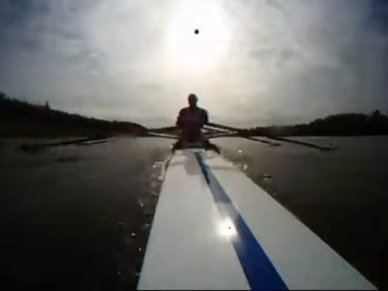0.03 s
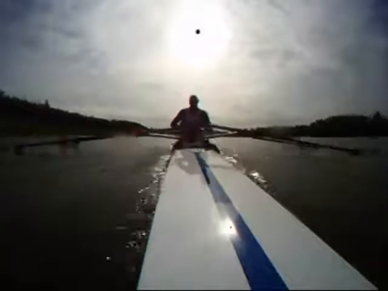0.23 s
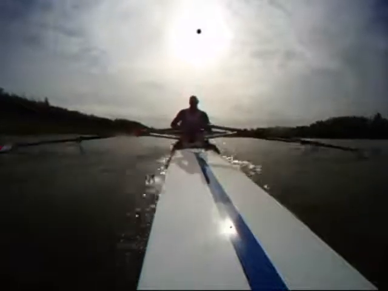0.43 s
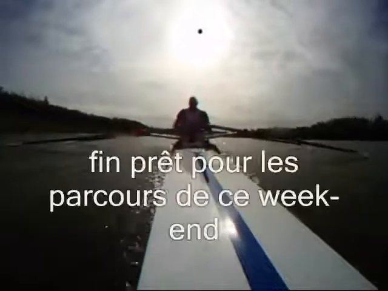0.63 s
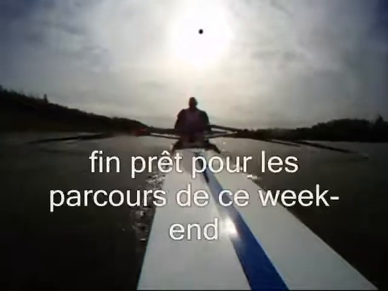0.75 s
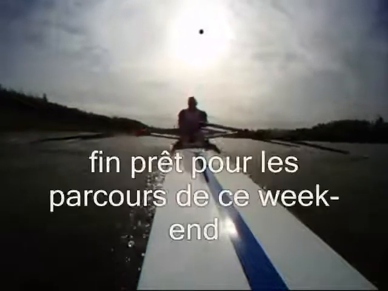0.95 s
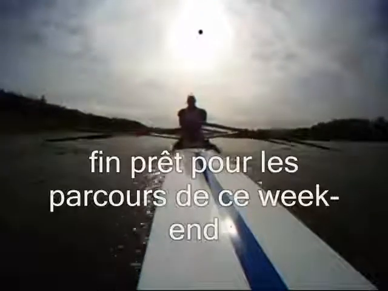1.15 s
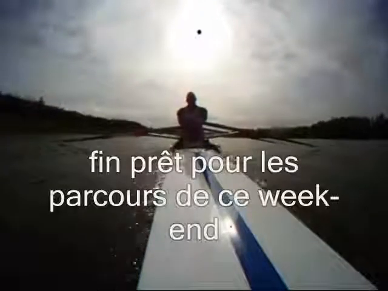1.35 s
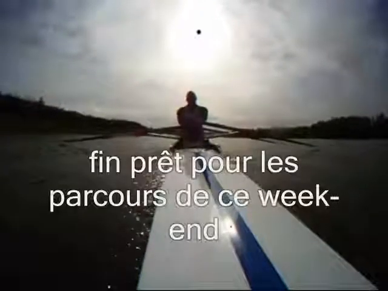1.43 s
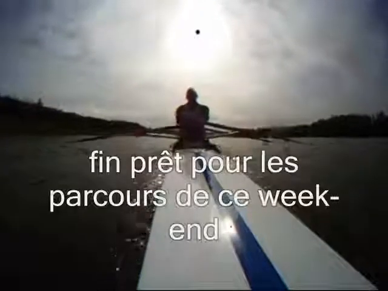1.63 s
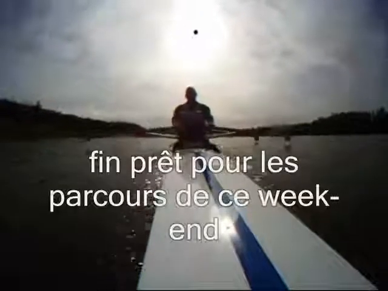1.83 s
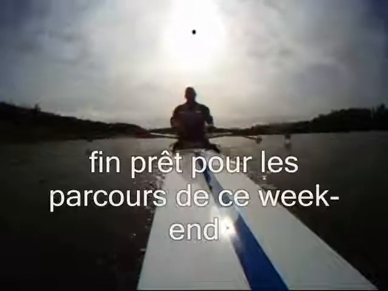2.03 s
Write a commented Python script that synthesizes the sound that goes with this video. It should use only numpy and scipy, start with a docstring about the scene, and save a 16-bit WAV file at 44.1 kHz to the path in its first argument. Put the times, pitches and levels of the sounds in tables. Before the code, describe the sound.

A rowing stroke, with clunking oars, a hollow hull boom, small splashes and light wind.

```python
"""A racing rowing boat, heard from its own deck. Water fizzes along the sides in a light wind.
At about 0.4 s the oars clunk round in their locks and leave the water with a short splash, while
the hollow hull booms and a loose fitting ticks. Then the seat rolls up its slide, making the hull
rumble. Near 1.7 s the blades drop in again, with more knocks, ticks and a few light clinks."""
import sys
import numpy as np
from scipy import signal
from scipy.fft import rfft, irfft, next_fast_len
from scipy.io import wavfile
from scipy.ndimage import uniform_filter1d

SR = 44100
rng = np.random.default_rng(int(sys.argv[2]) if len(sys.argv) > 2 else 0)


def wrap_up_sound(samples):
    """Save the sound to the file named by the first command line argument, as 16-bit audio."""
    columns = np.atleast_2d(samples).T
    # keep every value between -1 and 1, then stretch to whole-number steps
    tamed = np.clip(columns, -1, 1)
    steps = np.round(tamed * 32767).astype(np.int16)
    wavfile.write(sys.argv[1], SR, steps)


N = 92610
TIME = np.arange(N) / SR

# Levels are relative. A ring or fade time is how long a sound takes to drop by 60 dB.
# tone of the wind (f/Hz, level/dB)
WIND_TONE = [(20, 1.5), (45, 8), (75, 1), (110, -13.5), (250, -19.5), (500, -38)]
# water running along the hull (t/s, level/dB) and its tone (f/Hz, level/dB)
FLOW_LEVEL = [(0, -63), (.08, -66.5), (.12, -74), (.14, -69), (.16, -67.5), (.28, -63), (.7, -66.5),
              (.95, -62), (1.22, -65.5), (1.55, -60.5), (1.88, -65), (2.1, -67)]
FLOW_TONE = [(400, -3.5), (670, 3.5), (760, -4.5), (900, 3), (1200, -4.5), (1400, -1.5), (1580, 4.5),
             (2250, -3), (2500, -5), (3900, -11), (5200, -8.5), (5900, -11.5), (6350, -7), (6900, -18.5),
             (9000, -20), (9700, -13), (11000, -15.5), (12500, -17)]
# single drops on the deck (t/s, level/dB) and their tone (f/Hz, level/dB)
DECK_DROPS = [(0.023, -55), (0.039, -59), (.052, -53), (0.07, -50.5), (.088, -57), (1.1422, -49),
              (1.15, -52.5), (1.2921, -46.5), (1.305, -52.5), (1.384, -53.5), (2.042, -49.5), (2.083, -49)]
DROP_TONE = [(1200, -10), (3000, 6.5), (4500, -3), (8000, -12.5), (12500, -9)]
# splashes of the blades (peak t/s, level/dB, 20 dB rise/s, 20 dB fall/s) and their tone (f/Hz, level/dB)
BLADE_SPLASHES = [(0.154, -65, .008, 0.23), (0.317, -55.5, 0.0086, 0.094), (0.412, -42, 0.058, 0.07),
                  (.5, -55, .1, 0.34), (0.746, -56.5, 0.0091, 0.058), (1.03, -62, 0.15, 0.05),
                  (1.688, -58, 0.01, 0.059), (1.743, -52.5, 0.062, 0.15), (1.812, -55.5, 0.035, 0.026)]
SPLASH_TONE = [(400, 4.5), (700, -6), (1100, 0), (1700, -2.5), (2700, -8.5), (4200, -8), (6000, -13.5),
               (9500, -15), (12500, -14.5)]
# clinks of the rigging (t/s, level/dB) and the notes it rings at (f/Hz, level/dB, ring/s)
RIGGING_CLINKS = [(1.6795, -45.5), (1.9315, -45.5), (2.01, -57)]
RIGGING_NOTES = [(1572, 0, 0.03), (1700, -7, 0.028), (1950, -8, .025), (6360, -9, 0.029),
                 (9950, -12.5, .018)]
# ticks of a loose fitting (t/s, level/dB) and the notes it rings at (f/Hz, level/dB, ring/s)
FITTING_TICKS = [(.373, -45.5), (.383, -44.5), (.387, -43), (.421, -42), (.433, -41), (.439, -52),
                 (.4922, -41.5), (.504, -45), (.518, -45), (.526, -58), (.574, -49), (.586, -49.5),
                 (.5975, -46.5), (.611, -62), (.619, -53), (.6414, -57), (.6833, -56.5), (.7197, -53),
                 (.726, -65), (.7421, -56.5), (.7581, -51), (.796, -55), (1.0215, -52.5), (1.0509, -52),
                 (1.7354, -47.5), (1.7479, -45.5), (1.7615, -45), (1.771, -46), (1.7928, -49)]
FITTING_NOTES = [(2474, 0, 0.018), (2774, -0.5, 0.015), (5400, -2, 0.012), (7880, -14, 0.017),
                 (10600, -7.5, 0.01)]
# the hull's deepest vibration (t/s, level/dB)
BOOM_LEVEL = [(0.0, -44), (0.03, -41), (0.12, -53.5), (0.19, -27.5), (0.35, -34.5), (0.41, -14.5),
              (0.44, -14.5), (0.6, -28), (0.69, -27.5), (0.72, -37.5), (0.77, -27.5), (0.99, -32),
              (1.03, -27), (1.14, -43.5), (1.2, -33), (1.23, -40.5), (1.37, -34), (1.53, -46),
              (1.61, -35.5), (1.7, -31.5), (1.74, -22), (1.8, -24), (1.85, -35), (1.88, -30), (1.9, -28.5),
              (1.94, -44), (2.03, -34.5), (2.1, -44.5)]
# notes the hollow hull rings at (f/Hz, level/dB, ring/s)
HULL_NOTES = [(136.74, 10.5, 0.4), (166.7, -7, 0.28), (196, 2.5, 0.091), (269.6, -2, 0.15),
              (281.1, -0.5, 0.25), (356.1, -7.5, 0.12), (434.7, -5.5, 0.16), (499, -11.5, 0.19),
              (594.4, -10.5, 0.033), (663.6, -15, 0.29), (890, -15.5, 0.023)]
# low, middle and upper rumble as seat and oars shake the hull (t/s, level/dB)
LOW_RUMBLE = [(0, -54), (.13, -56), (.155, -43), (.25, -47), (.3, -34), (.42, -29), (.54, -32), (.63, -44),
              (.84, -48), (.93, -39), (.98, -47), (1.03, -45.5), (1.19, -48), (1.57, -52), (1.68, -49),
              (1.81, -32.5), (1.86, -44), (1.92, -38.5), (2.1, -55)]
MID_RUMBLE = [(0, -56), (.135, -56.5), (.155, -41), (.22, -44.5), (.3, -40), (.335, -30.5), (.41, -40.5),
              (.5, -36), (.63, -51.5), (.76, -48), (.97, -60), (1.03, -44), (1.25, -57.5), (1.32, -54),
              (1.42, -59.5), (1.58, -58), (1.62, -50.5), (1.67, -52.5), (1.72, -30.5), (1.76, -39),
              (1.81, -28.5), (1.88, -49.5), (1.92, -41), (1.99, -55), (2.1, -56.5)]
UPPER_RUMBLE = [(0, -68.5), (.135, -69.5), (.155, -53), (.23, -57.5), (.3, -52), (.335, -57), (.42, -38.5),
                (.48, -47.5), (.62, -65), (.7, -55), (.75, -101), (.8, -68), (.99, -73), (1.02, -57),
                (1.1, -71), (1.45, -71), (1.67, -64), (1.7, -48.5), (1.77, -55), (1.82, -42), (1.88, -60),
                (2, -66), (2.1, -95)]
# knocks on the hull (t/s, level/dB, favoured f/Hz)
HULL_KNOCKS = [(.148, -33.5, 214), (.29, -37, 148), (.331, -21.5, 350), (0.3904, -15, 180.8),
               (.742, -43, 450), (1.003, -37, 140), (1.02, -38.5, 399), (1.301, -43, 326),
               (1.482, -35, 309), (1.609, -44, 350), (1.697, -28, 294), (1.79, -29, 258), (1.815, -26, 408),
               (1.915, -36.5, 214), (2.01, -34, 304)]
# oars hitting their locks (t/s, crack level/dB, crack fade/s, thud level/dB)
OAR_HITS = [(0.337, -56, 0.014, -34.5), (0.349, -49, .012, -48), (0.3713, -35, 0.0064, -31),
            (.3897, -33.5, 0.059, -20), (0.3945, -34, 0.018, -25.5), (0.4044, -29, 0.022, -29.5),
            (0.4139, -25.5, 0.012, -17), (.416, -24, 0.02, -29.5), (0.431, -38, 0.022, -46)]
# tone of the crack (f/Hz, level/dB)
CRACK_TONE = [(350, 6), (680, 2), (880, -2), (1250, -4), (1530, 2), (2000, -9.5), (2550, -5.5), (4100, -22),
              (5400, -11.5), (6800, -17.5), (8000, -22), (9500, -18), (12500, -29)]
# notes of the rigger, the arm that holds the lock (f/Hz, level/dB, ring/s)
RIGGER_NOTES = [(234.6, 0.5, .1), (251, -4, 0.26), (332, -6, 0.15), (372.5, -4.5, 0.078),
                (432.4, -6.5, .11), (470, -8, 0.071), (498, -9.5, 0.098), (600, -29, 0.094),
                (765, -21, .06), (828, -27, 0.081), (1480, -22, 0.034)]
# high pitches around which the bass is mirrored (f/Hz, level/dB)
SIZZLE_PITCHES = [(8013, 4.5), (12060, -7.5)]


def from_db(db):
    return 10 ** (np.asarray(db) / 20)


def unit_level(x):
    """Scales a signal to an average power of 1."""
    return x / np.sqrt(np.mean(x ** 2) + 1e-20)


def curve(points):
    """Joins (time, value) points with straight lines."""
    return np.interp(TIME, *np.transpose(points))


def filtered(x, hz, kind="low", order=2):
    """Keeps the lows, the highs or a band between two pitches."""
    return signal.sosfilt(signal.butter(order, hz, kind, fs=SR, output="sos"), x)


def drift(rate_hz):
    """A smooth random wander, about 1 in size."""
    step, warm_up = 40, 2000
    r = np.exp(-2 * np.pi * rate_hz * step / SR)
    noise = rng.standard_normal(N // step + warm_up + 2)
    slow = signal.lfilter([1], [1, -2 * r, r * r], noise)[warm_up:]
    return np.interp(np.arange(N) / step, np.arange(len(slow)), unit_level(slow))


def ring(x, hz, ring_s):
    """Every push in x starts a pure note that dies away."""
    r = from_db(-60 / (ring_s * SR))
    angle = 2 * np.pi * hz / SR
    return signal.lfilter([0, np.sin(angle)], [1, -2 * r * np.cos(angle), r * r], x + 1e-18)


def shape_tone(x, tone):
    """Gives x the balance of lows and highs in a tone table, fading beyond its ends."""
    size = 2 * next_fast_len(N)
    hz, db = np.transpose(tone)
    f = np.maximum(np.arange(size // 2 + 1) * SR / size, 1)
    gain = from_db(np.interp(np.log(f), np.log(hz), db))
    gain /= np.hypot(1, (hz[0] / f) ** 2 / 2) * np.hypot(1, (f / hz[-1]) ** 4 / 2)
    # fold the filter so that nothing sounds before the hit that causes it
    folded = irfft(np.log(unit_level(gain) + 1e-9))
    folded[1:size // 2] *= 2
    folded[size // 2 + 1:] = 0
    return irfft(rfft(x, size) * np.exp(rfft(folded)))[:N]


def burst(start, fade_s):
    """A rough touch: noise that starts at once and dies away."""
    age = TIME - start
    return rng.standard_normal(N) * (age >= 0) * from_db(-60 * np.maximum(age, 0) / fade_s)


def crackle(per_s, spread_db):
    """Random clicks of uneven size."""
    sizes = from_db(spread_db * np.minimum(rng.exponential(1, N), 4)) * rng.choice([-1, 1], N)
    return unit_level(sizes * (rng.random(N) < per_s / SR))


def clicks(times, gains):
    """Single clicks at the given times."""
    out = np.zeros(N)
    np.add.at(out, np.clip((times * SR).astype(int), 0, N - 1), gains)
    return out


def follow_boom(amount):
    """A gain that rises and falls with the hull's boom."""
    boom_db = curve(BOOM_LEVEL)
    return from_db(amount * (boom_db - boom_db.mean()))


def wind():
    """Low buffeting that grows as the boat lurches."""
    return from_db(-42) * follow_boom(0.88) * shape_tone(rng.standard_normal(N), WIND_TONE)


def water():
    """Water fizzes along the hull; fine spray and single drops land on the deck."""
    flow = from_db(curve(FLOW_LEVEL) + 2.1 * drift(rate_hz=20))
    fizz = shape_tone(flow * crackle(per_s=7000, spread_db=5), FLOW_TONE)
    drops = sum(from_db(db) * burst(t, fade_s=0.0074) for t, db in DECK_DROPS)
    spray = from_db(-73) * crackle(per_s=250, spread_db=2.5)
    return fizz + shape_tone(drops + spray, DROP_TONE)


def splashes():
    """Blades leave and enter the water in a swell of fine crackle."""
    swell = sum(from_db(db - 20 * np.maximum((t - TIME) / rise, (TIME - t) / fall))
                for t, db, rise, fall in BLADE_SPLASHES)
    return shape_tone(swell * crackle(per_s=3500, spread_db=4), SPLASH_TONE)


def fitting_chatter():
    """The loose fitting rattles faintly, more so as the hull booms."""
    touches = from_db(-76) * follow_boom(0.79) * crackle(per_s=110, spread_db=3)
    # the square root stops long-ringing notes from building up louder
    return sum(from_db(db) * np.sqrt(np.log(1000) / (ring_s * SR)) * ring(touches, hz, ring_s)
               for hz, db, ring_s in FITTING_NOTES)


def small_part_taps(taps, notes, gain_db, scatter_db, grit, pitch_spread):
    """Light, gritty taps ring a small part, each with a slightly different pitch and mix of notes."""
    out = 0
    for t, db in taps:
        touch = clicks(np.array([t]), 1) + grit * burst(t, fade_s=0.012)
        tuning = 1 + pitch_spread * rng.standard_normal()
        for k, (hz, note_db, ring_s) in enumerate(notes):
            strength = from_db(gain_db + db + note_db + scatter_db * rng.standard_normal())
            out += (-1) ** k * strength * ring(touch, hz * tuning, ring_s)
    return out


def hull_boom(pitch_hz=47.53, wander_hz=1.53):
    """The deepest vibration of the boat, wandering a little in pitch."""
    phase = 2 * np.pi * np.cumsum(pitch_hz + wander_hz * drift(rate_hz=5.68)) / SR
    return np.sqrt(2) * from_db(curve(BOOM_LEVEL)) * np.sin(phase)


def hull_rumble(smooth_s=0.0402):
    """The rolling seat and turning oars shake the hull's low, middle and upper notes."""
    out = 0
    for level, gain_db, low_hz, high_hz in (
            (LOW_RUMBLE, -1, 90, 175), (MID_RUMBLE, -1.5, 175, 390), (UPPER_RUMBLE, -4, 390, 900)):
        notes = sum(from_db(db) * unit_level(ring(rng.standard_normal(N + SR), hz, ring_s))
                    for hz, db, ring_s in HULL_NOTES if low_hz <= hz < high_hz)
        band = filtered(notes, [low_hz * 0.88, high_hz * 1.014], "band")[SR:]  # skip the build-up
        power = np.abs(uniform_filter1d(band ** 2, int(smooth_s * SR)))
        steady = band / np.sqrt(power + 1e-20)  # even out chance swells
        out += from_db(curve(level) + gain_db) * steady
    return out


def hull_knocks(width_octaves=0.15):
    """Each knock rings the hull, most strongly near the pitch that it favours."""
    times, db, favoured_hz = np.transpose(HULL_KNOCKS)
    out = 0
    for hz, note_db, ring_s in HULL_NOTES:
        share = 1 / (1 + (np.log2(hz / favoured_hz) / width_octaves) ** 4)
        blows = clicks(times, from_db(db + note_db) * share)
        out -= filtered(ring(blows, hz, ring_s), hz * 1.42)
    return out


def oarlocks(snap_gain_db=12, thud_gain_db=-4.5):
    """The oars turn and drop flat in their locks: quick, hard hits that crack and ring the rigger."""
    times, crack_db, _, thud_db = np.transpose(OAR_HITS)
    snap = clicks(times, from_db(crack_db + snap_gain_db))
    grind = sum(from_db(db) * burst(t, fade_s) for t, db, fade_s, _ in OAR_HITS)
    crack = shape_tone(snap + grind, CRACK_TONE)
    blows = clicks(times, from_db(thud_db + thud_gain_db))
    thud = sum(from_db(db) * filtered(ring(blows, hz, ring_s), hz / 2, "high", order=1)
               for hz, db, ring_s in RIGGER_NOTES)
    return -(crack + thud)


def scene():
    """Boat, oars, water and wind added into one channel."""
    hull = hull_boom() + hull_rumble() + hull_knocks()
    ticks = small_part_taps(FITTING_TICKS, FITTING_NOTES,
                            gain_db=-0.5, scatter_db=1.15, grit=0.14, pitch_spread=0.024)
    clinks = small_part_taps(RIGGING_CLINKS, RIGGING_NOTES,
                             gain_db=-1.5, scatter_db=4.5, grit=0.15, pitch_spread=0.0075)
    return (hull + oarlocks() + ticks + fitting_chatter() + clinks + splashes() + water() + wind())[None]


def record(dry, bass_hz=890, cutoff_hz=12800):
    """Mirrors the bass into the treble as a thin sizzle, then cuts off the very highest sounds."""
    bass_slope = np.diff(filtered(dry, bass_hz), prepend=0)
    mirrors = sum(from_db(db) * np.cos(2 * np.pi * hz * TIME) for hz, db in SIZZLE_PITCHES)
    steep_cut = signal.ellip(12, .2, 80, cutoff_hz, fs=SR, output="sos")
    return signal.sosfilt(steep_cut, dry + bass_slope * mirrors)


dry = scene()
out = record(dry)
wrap_up_sound(out)
```